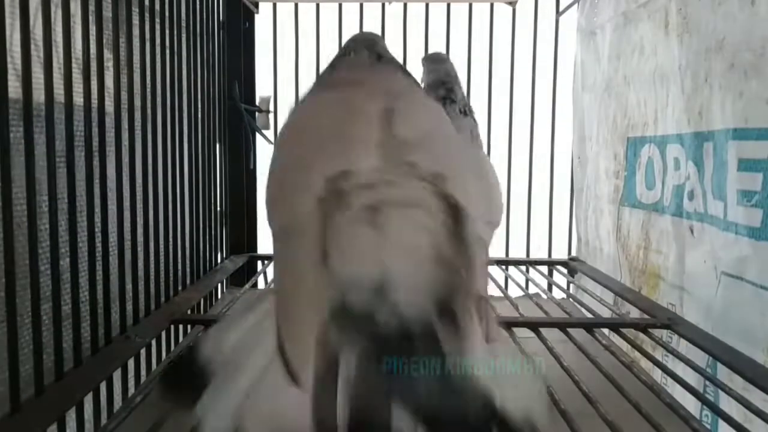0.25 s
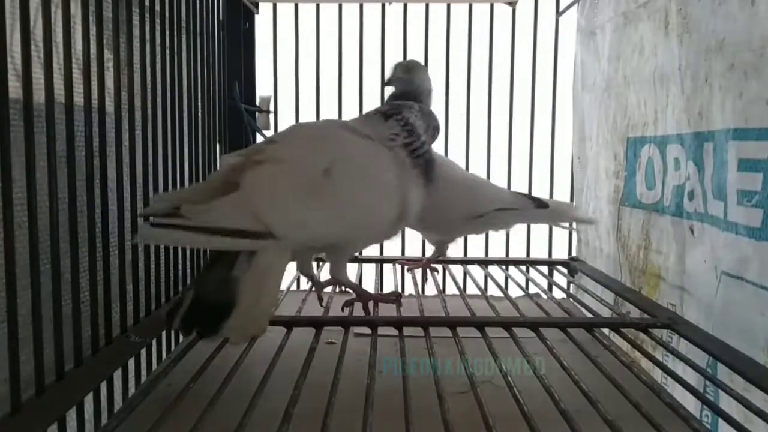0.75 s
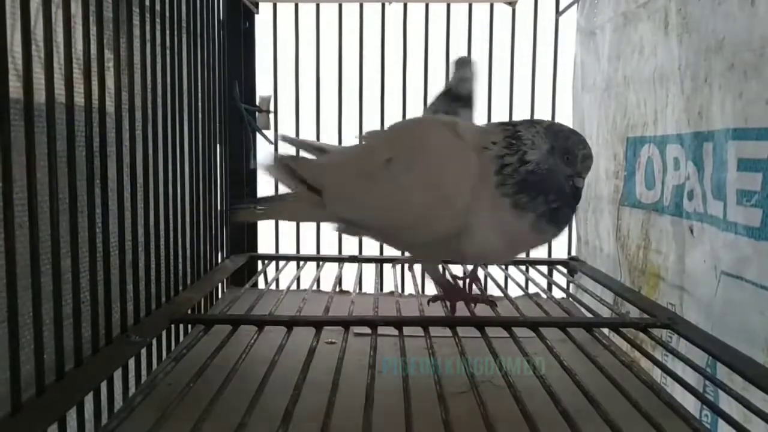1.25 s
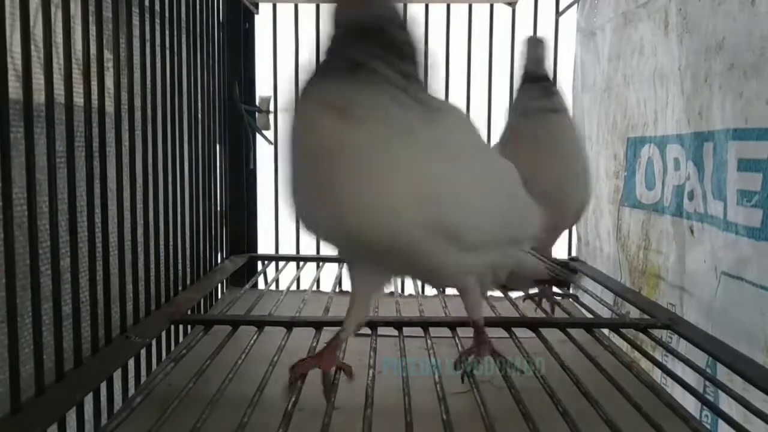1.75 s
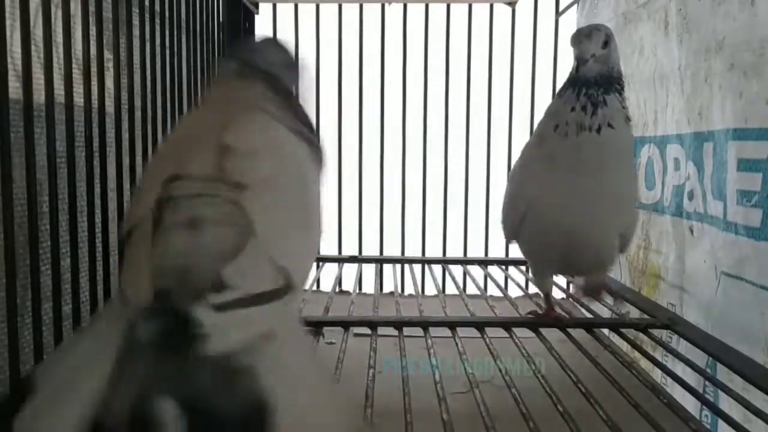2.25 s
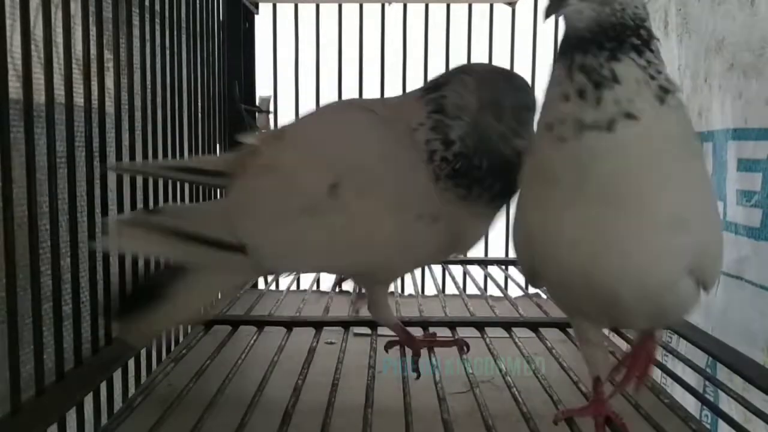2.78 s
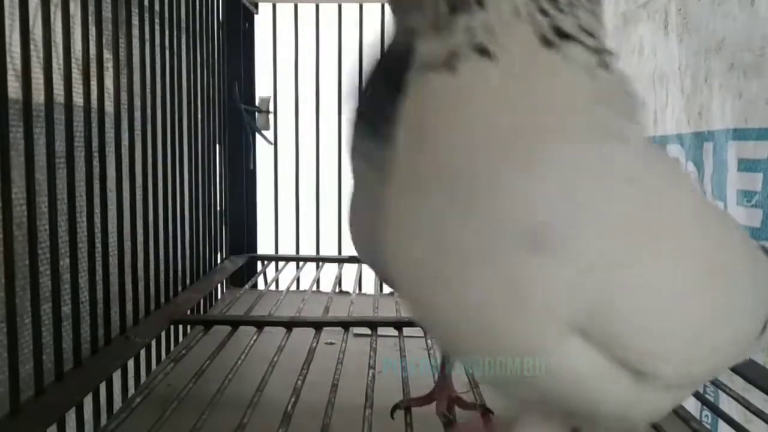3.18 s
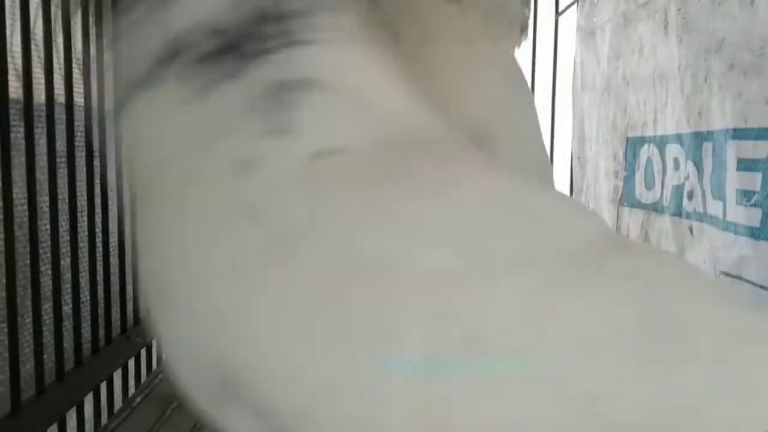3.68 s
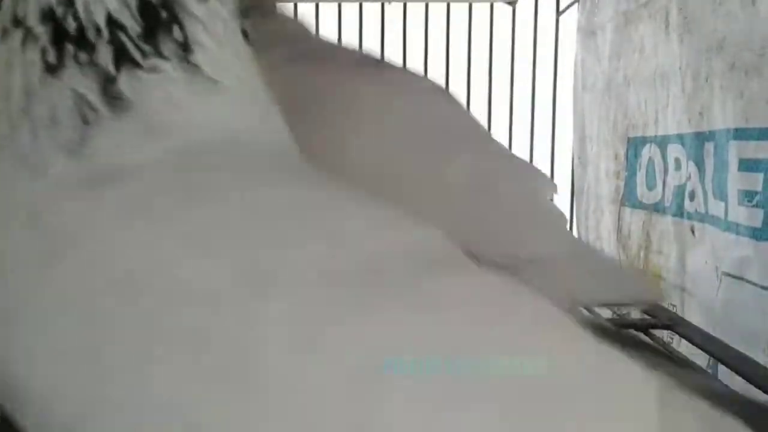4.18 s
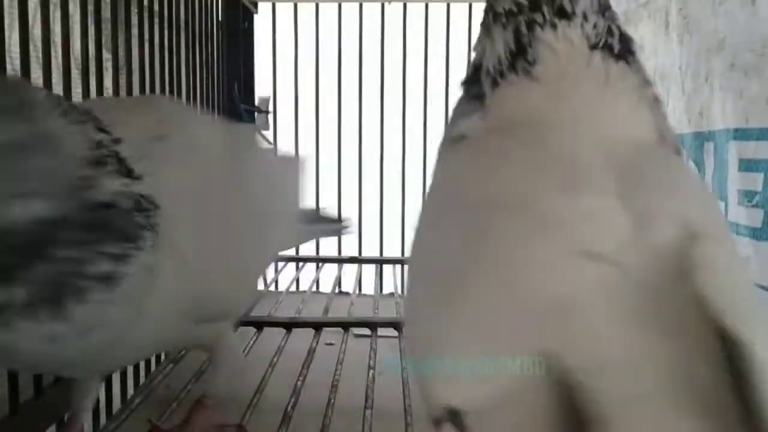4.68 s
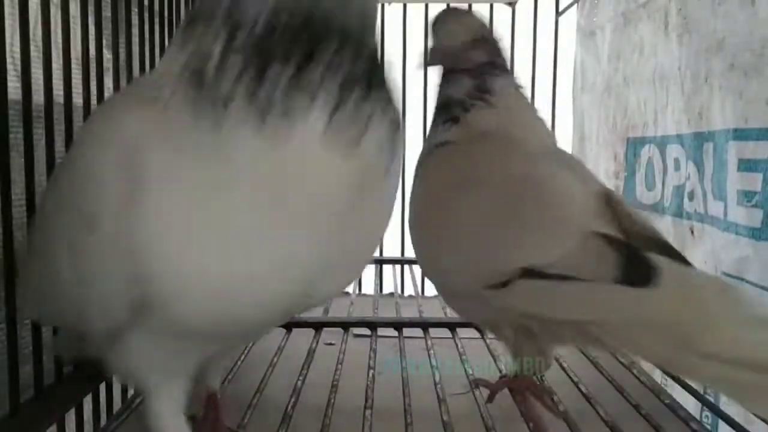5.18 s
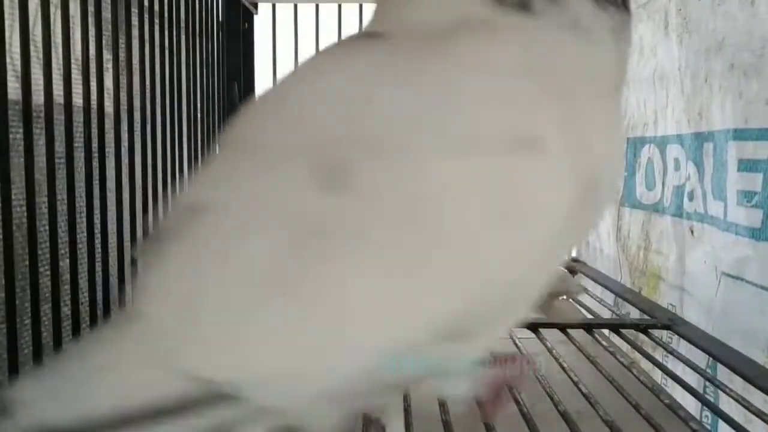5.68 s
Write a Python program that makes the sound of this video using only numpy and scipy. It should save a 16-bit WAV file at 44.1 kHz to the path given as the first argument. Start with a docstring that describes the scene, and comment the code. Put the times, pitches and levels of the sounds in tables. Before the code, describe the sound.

A phone microphone close to a cage in a shed catches a brief feather rustle, a wire tick and a distant crow, then deep pigeon coos at about one, three and five seconds, accelerating into soft rolls. Softer pigeon notes fill the gaps, with metallic claw scrapes, tiny dull foot knocks, a thin far whistle midway and a quiet rumbling background.

```python
"""A pigeon loft: a cock in a wire cage coos three times, in low throbs of a note and its octave that speed into a roll.
Held pigeon notes that swell and stop, short near-pure throbs and gliding or held notes of other pigeons sound around it.
Claws tick, scrape and ring the wire through its bending modes; feet knock the slats as short damped tones.
Plumage brushing the bars is bright patchy noise; a far rooster and a thin whistle are gliding tones. Rumble, draught,
hiss and a soft low noise that swells with each roll are shaped noise; other birds and feet get a short diffuse echo."""
import sys
import numpy as np
from scipy import signal
from scipy.fft import rfft, irfft, next_fast_len
from scipy.io import wavfile
from scipy.ndimage import uniform_filter1d, minimum_filter1d, map_coordinates

SR = 44100
rng = np.random.default_rng(int(sys.argv[2]) if len(sys.argv) > 2 else 0)


def to_wav(s):
    """Save 16-bit WAV."""
    ch = np.atleast_2d(s).T  # columns
    pcm = np.round(np.clip(ch, -1, 1) * 32767)  # PCM
    wavfile.write(sys.argv[1], SR, pcm.astype(np.int16))


N = 261513

# the roll that ends each coo: start/s, end/s, first rate/(throbs per s), last rate/(throbs per s),
# relative peak level/dB, pitch at the start/Hz, peak level of the soft low noise under it/dB
COO_ROLLS = [(1.472, 1.82, 35.4, 48.3, -17, 230, -27.5), (3.312, 3.64, 37.7, 51.5, -14.5, 235, -26),
             (5.222, 5.5, 40.6, 51, -13, 236, -25)]
# spectrum of the soft low noise and of the cock's rasp: f/Hz, relative level per Hz/dB
LOW_NOISE_SPECTRUM = [(150, -40), (227, -1), (300, -3), (445, -2.5), (500, -21.5), (670, -23.5), (900, -45),
                      (1500, -100)]
# spectrum of plumage on the bars, also the base colour of claw scratches: f/Hz, relative level per Hz/dB
BRUSH_SPECTRUM = [(600, -52), (1000, -16), (1850, -10.5), (3460, -9.5), (5310, -6), (8160, 0),
                  (11000, -3.5), (16000, -8)]


def cock(breath_db=-22, rasp_db=-16, third_db=-32, note_s=0.0052, octave_s=0.0056):
    """One running note and its octave, let out in throbs that bend upward; rasp and breath ride on each."""
    # separate throbs before each roll: t/s, relative peak level/dB, pitch/Hz, octave over the note/dB
    single_throbs = [(1.008, -21.5, 222.7, -3.5), (1.152, -19.5, 228.5, -0.5), (1.233, -18.5, 226.6, 0.5),
                     (1.287, -18, 230.9, -0.5), (1.341, -14.5, 230, -1.5), (1.386, -14.5, 227.6, 0),
                     (1.425, -12.5, 227.3, -4.5), (2.886, -18.5, 227, -1), (2.943, -14.5, 229.5, -3),
                     (3.011, -12, 232, -2.5), (3.096, -14.5, 235.9, -1.5), (3.181, -14.5, 234, 1),
                     (3.24, -14, 238.5, 0), (3.282, -14.5, 237, -1.5), (4.599, -17, 199.7, -0.5),
                     (4.766, -13.5, 228.1, -7), (4.842, -11.5, 224.9, -5), (4.916, -12, 233.8, -1),
                     (5.004, -13.5, 239.6, -1.5), (5.085, -14, 258.7, -11), (5.133, -11.5, 258, -7),
                     (5.176, -20, 244, 2), (5.194, -8, 250.6, -7)]
    # breath resonances of the throat: f/Hz, width/Hz, level/dB, all before the sum is squared
    throat_modes = [(218, 110, -3.5), (537, 13, 3), (720, 200, -53.5)]
    scatter_db, jitter_s = 1, 0.0005  # throb to throb
    octave_late_s = 0.00033  # the octave peaks just after the note
    sag_hz = 21.02  # fall of pitch through a roll
    bend_hz = 6.7  # slope of the upward bend at mid-throb, in Hz per note_s
    thin_hz = 204  # the throat radiates little below this

    note, octave, bend = np.zeros((3, N))
    t = np.arange(-SR // 20, SR // 20) / SR
    throbs = [(s, db, octave_db) for s, db, _, octave_db in single_throbs]
    throbs += [beat for coo in COO_ROLLS for beat in roll(*coo[:5])]
    note_bell = np.exp(-(t / note_s) ** 2 / 2)
    octave_bell = np.exp(-(t / octave_s) ** 2 / 2)
    for (s, db, octave_db), chance in zip(throbs, rng.standard_normal((len(throbs), 3))):
        s += t[0] + jitter_s * chance[2]
        add(note, s, amp(db + scatter_db * chance[0]) * note_bell)
        add(octave, s + octave_late_s, amp(db + octave_db + scatter_db * chance[1]) * octave_bell)
        add(bend, s, bend_hz * t / note_s * note_bell)

    pitch_points = [(s, hz) for s, _, hz, _ in single_throbs]
    for s, end, *_, hz, _ in COO_ROLLS:
        pitch_points += [(s, hz), ((s + end) / 2, hz - sag_hz / 2), (end, hz - sag_hz)]
    pitch = curves(sorted(pitch_points))[0] + bend
    phase = 2 * np.pi * (np.cumsum(pitch * (1 + 0.01182 * wobble(25))) / SR + rng.random())
    low = filtered(note * np.cos(phase), lambda f: 1 - 1 / (1 + (f / thin_hz) ** 6))
    high = octave * (np.cos(2 * phase + 0.26) + amp(third_db) * np.cos(3 * phase))

    def throat(f):
        return sum(amp(db) * 1j * f * w / (c * c - f * f + 1j * f * w) for c, w, db in throat_modes) ** 2

    rasp = unit(filtered(rng.standard_normal(N), lambda f: amp(along(LOW_NOISE_SPECTRUM, f))))
    breath = unit(filtered(rng.standard_normal(N), throat))
    return low + high + amp(rasp_db) * note * rasp + amp(breath_db) * octave * breath


def roll(start, end, rate, last_rate, db, octave_db=1.5, fade_db=9.5, octave_fade_db=2):
    """Throbs (s, peak dB, octave over the note dB) that quicken and die away, the octave falling further."""
    t = np.arange(0, end - start, 1 / SR)
    beats = np.cumsum(rate + (last_rate - rate) * t / t[-1]) / SR
    s = t[np.searchsorted(beats, np.arange(int(beats[-1]) + 1))]
    late = (s / t[-1]) ** 3
    return zip(start + s, db - fade_db * late, octave_db - octave_fade_db * late)


def swelling_notes(flutter=0.18, swell=0.27, release_s=0.01):
    """Held pigeon notes that swell for a share of their length, hold and stop; strength and pitch flutter."""
    # notes: start/s, end/s, pitch/Hz, relative level/dB
    notes = [(0.776, 0.803, 410, -31.5), (0.818, 0.866, 441, -21.5), (0.996, 1.028, 397, -23),
             (1.166, 1.215, 434, -25.5), (1.191, 1.296, 375.3, -29.5), (1.295, 1.323, 434, -20.5),
             (1.375, 1.555, 386.6, -25), (1.582, 1.758, 381.8, -25.5), (1.991, 2.038, 438, -32),
             (2.199, 2.403, 345, -34), (2.47, 2.511, 246, -30), (2.525, 2.575, 294, -32),
             (3.651, 3.697, 430, -30.5), (3.698, 3.868, 241.2, -37), (4.053, 4.153, 451, -45),
             (2.497, 2.549, 450, -32), (2.572, 2.658, 434.5, -31.5), (2.705, 2.752, 432, -21),
             (2.767, 2.812, 434, -33.5), (2.884, 3.01, 383, -25), (3.01, 3.106, 388.8, -24),
             (3.146, 3.254, 374.5, -21.5), (3.249, 3.3, 384, -15), (3.337, 3.374, 382, -14),
             (3.374, 3.637, 378.3, -23.5), (3.844, 3.92, 446.6, -30.5), (4.408, 4.439, 363, -28),
             (4.42, 4.477, 322, -32), (4.595, 4.635, 375.5, -19), (4.678, 4.801, 419.3, -27.5),
             (4.81, 4.843, 390, -24.5), (4.853, 4.918, 408, -26.5), (4.921, 5.005, 392.2, -28),
             (5.046, 5.12, 440, -16), (5.132, 5.183, 431.5, -15.5), (5.053, 5.262, 367, -21),
             (5.223, 5.515, 374, -24)]
    out = np.zeros(N)
    strength = 1 + flutter * wobble(45)
    waver = 1 + 0.016 * wobble(25)
    for start, end, hz, db in notes:
        t = np.arange(0, end - start, 1 / SR)
        ramp = np.clip(np.minimum(t / (swell * t[-1]), (t[-1] - t) / release_s), 0, 1)
        pitch = hz * waver[round(start * SR):][:len(t)]
        add(out, start, amp(db) * np.sin(np.pi / 2 * ramp) * tone(pitch))
    return out * strength


def loft(width_s=0.0056):
    """Near-pure throbs of the other birds: sines under short bell-shaped swells."""
    # throbs: t/s, pitch/Hz, relative peak level/dB
    short_throbs = [(0.132, 320, -24), (0.15, 400, -27), (0.155, 252, -28), (0.19, 385, -26),
                    (1.14, 326, -25), (1.767, 345.7, -22), (1.825, 310, -21.5), (1.881, 305, -15.5),
                    (1.947, 324, -19), (1.999, 264, -19.5), (2.044, 283, -17.5), (2.157, 272, -20),
                    (2.214, 362, -21.5), (2.273, 433, -21), (2.316, 425, -19.5), (2.36, 421, -17.5),
                    (2.41, 414, -18), (2.461, 393, -21), (2.581, 414, -22), (2.669, 422, -20),
                    (3.673, 358, -14), (3.745, 347, -14.5), (3.815, 313, -16.5), (3.881, 337, -15.5),
                    (3.942, 310, -19.5), (4.011, 322, -16.5), (4.062, 323, -16.5), (4.095, 342, -21),
                    (4.122, 334, -19), (4.143, 294, -20), (4.451, 460, -26), (4.762, 350, -17.5),
                    (5.0, 361, -16), (5.503, 359.5, -21), (5.845, 314, -23.5)]
    out, t = np.zeros(N), np.arange(-SR // 20, SR // 20) / SR
    bell = np.exp(-(t / width_s) ** 2 / 2)
    for (s, hz, db), turn in zip(short_throbs, rng.random((len(short_throbs), 1))):
        add(out, s + t[0], amp(db) * bell * np.cos(2 * np.pi * (hz * t + turn)))
    return out


def gliding_notes(fade_db=1):
    """Gliding or held notes of other pigeons, some steady, some throbbing as their level rises and falls."""
    # start/s, end/s, first pitch/Hz, last pitch/Hz, relative level/dB, rate/(throbs per s), depth/(0-1)
    glides = [(0.002, 0.045, 215, 220, -32, 40, 0.15), (0.036, 0.11, 275, 300, -30.5, 49, 0.9),
              (0.128, 0.211, 289, 303, -32, 85, 0.96), (0.189, 0.304, 300, 263, -28, 34, 0.1),
              (0.284, 0.357, 270, 247, -37, 34, 0), (0.352, 0.45, 239.2, 222, -39.5, 43, 0),
              (0.537, 0.728, 452, 447, -35.5, 23, 0), (0.49, 0.778, 229.7, 220, -43.5, 23, 0.1),
              (2.067, 2.285, 306.5, 226, -28.5, 48, 0.54), (4.15, 4.327, 315, 276, -29.5, 48, 0.9),
              (4.31, 4.37, 227.6, 240, -28, 24, 0.16), (4.377, 4.432, 222, 235, -28, 21, 0.3),
              (4.341, 4.4, 441, 340, -33, 37, 0.6), (4.457, 4.542, 460, 353, -30, 46, 0.14),
              (5.524, 5.852, 321.3, 366, -30, 42.4, 0.48), (5.854, 5.952, 287.7, 330, -33.5, 61, 1)]
    out = np.zeros(N)
    for start, end, hz, last_hz, db, rate, depth in glides:
        rows = [(start, hz, db), (end, last_hz, db - fade_db)]
        pitch, level_db = curves(rows)
        beat = 2 * np.pi * rate * (np.arange(N) / SR - start) + 0.5 * wobble(25)
        throb = (1 - depth * np.cos(beat)) * amp(0.61 * wobble(27))
        out += gate(rows, 0.014) * amp(level_db) * throb * tone(pitch * (1 + 0.0142 * wobble(35)))
    return out


def hoarse(noise_db=-14, width_hz=70):
    """A gain around 1 that roughens a pure note with noise within width_hz of its pitch."""
    return 1 + amp(noise_db) * wobble(2 * width_hz)


def claws(tick_db=-3, scrape_db=-9, alike=0.043, scratch_db=4, slope_db=30):
    """A crisp tick, a scratchy scrape and the ringing modes of the wire that was caught."""
    # catches: t/s, relative level/dB, wire pitch/Hz, brightest f/Hz, t60/s (0.02 at least),
    # ring over the scratch/dB
    wire_catches = [(0.4605, -25.5, 6340, 7400, 0.16, 3), (0.9595, -28.5, 5960, 9660, 0.24, -10.5),
                    (0.99, -18.5, 6200, 6260, 0.026, -3), (1.0955, -26, 5950, 10200, 0.27, -11),
                    (1.32, -28, 5820, 8406, 0.13, -9.5), (1.633, -19.5, 5900, 8200, 0.22, -12.5),
                    (1.687, -30.5, 5770, 7700, 0.16, -4), (1.797, -40, 6480, 11500, 0.092, -3),
                    (1.9, -28.5, 5740, 9460, 0.21, -2.5), (2.033, -34.5, 6230, 10300, 0.25, -3),
                    (2.1707, -30.5, 5930, 7540, 0.44, -8), (2.5518, -28.5, 6040, 8450, 0.19, -12.5),
                    (2.647, -19.5, 6250, 8060, 0.03, -12), (2.782, -20, 6400, 8380, .03, -14),
                    (2.794, -21.5, 6340, 8060, 0.18, -24), (2.8345, -19.5, 6400, 7670, 0.14, -12),
                    (2.846, -32, 6240, 9000, 0.11, -7), (2.863, -18, 6100, 7760, 0.041, -9),
                    (2.877, -31, 5940, 7800, 0.055, -12), (3.011, -29.5, 5840, 10170, 0.23, -4.5),
                    (3.11, -32, 5840, 11200, 0.15, -9), (3.214, -32, 6180, 10980, 0.71, -15),
                    (3.398, -36, 5937, 9300, 0.21, -5), (3.849, -24, 6410, 11000, 0.25, -11.5),
                    (3.985, -38.5, 6480, 6900, 0.13, 0.5), (4.268, -34, 6050, 9300, 0.3, -3),
                    (4.437, -29, 6000, 9700, 0.27, -17), (4.4694, -29.5, 5690, 11800, 0.11, -1.5),
                    (4.6252, -29, 6275, 9900, 0.31, -11.5), (4.7075, -25.5, 5810, 6800, 0.2, -14),
                    (5.066, -28.5, 6310, 6930, 0.26, -3.5), (5.231, -26.5, 6530, 8500, 0.19, -11),
                    (5.3366, -32.5, 6010, 7364, 0.16, -1)]
    # bending modes of the wire: multiple of the pitch, relative level/dB
    wire_modes = [(.82, -9), (1, -1), (1.265, 0), (1.565, 0), (1.915, 0), (2.27, 0)]
    ring_width_hz, ring_alike = 420, 0.4  # spread of each mode's cluster; share common to both channels

    out, t = np.zeros((2, N)), np.arange(SR // 4) / SR
    multiple, level = np.transpose(wire_modes)[..., None]
    for s, db, hz, bright_hz, t60, ring_db in wire_catches:
        near = -slope_db * np.log(multiple * hz / bright_hz) ** 2
        fade = amp(-60 * t / max(t60, 0.02))
        draw = rng.standard_normal((2, len(wire_modes), 1))

        # neighbouring wires ring along, so each mode beats unevenly and differs from left to right
        knots = rng.standard_normal((2, 3, len(wire_modes), int(t[-1] * ring_width_hz) + 2))
        knots = (knots[0] + 1j * knots[1]) / np.sqrt(2)
        knots = np.sqrt(ring_alike) * knots[0] + np.sqrt(1 - ring_alike) * knots[1:]
        beats = signal.resample(knots, len(t), axis=2)
        mode_hz = hz * multiple * (1 + 0.008 * draw[1])
        modes = amp(level + near + 2 * draw[0]) * np.real(beats * np.exp(2j * np.pi * mode_hz * t))
        ring = amp(ring_db) * modes.sum(axis=1)

        grit = rng.standard_normal((3, len(t)))
        grit = alike * grit[0] + (1 - alike) * grit[1:]
        grit = unit(filtered(grit, lambda f: amp(along(BRUSH_SPECTRUM, f)) * f / (f + 4000)))
        # the claw catches and slips every few milliseconds
        catches = amp(scratch_db * np.interp(t, np.arange(60) * 0.0067, rng.standard_normal(60)))
        scrape = amp(scrape_db) * catches * grit
        tick = amp(tick_db - 60 * t / 0.022) * (1 - np.exp(-(t / 0.002) ** 2))
        builds = fade * (1 - np.exp(-(t / 0.004) ** 2))
        sound = amp(db) * (grit * tick + builds * (scrape + ring))
        add(out[0], s, sound[0])
        add(out[1], s, sound[1])
    return late_left(out)


def steps():
    """Feet on the slats: dull knocks of thin wood, each a pair of quickly damped modes."""
    # knocks: t/s, relative level/dB, pitch/Hz
    knocks = [(0.489, -39, 650), (0.508, -36.5, 628), (0.535, -43, 607), (0.57, -41, 693),
              (0.872, -34, 687), (1.036, -39.5, 626), (1.277, -37, 620), (1.292, -38, 668),
              (1.439, -41, 630), (1.55, -36, 570), (2.416, -41.5, 702), (2.436, -39, 636),
              (2.757, -29.5, 693), (4.306, -42, 704), (4.325, -36, 640), (4.646, -30, 570),
              (5.034, -42.5, 756), (5.57, -50, 625)]
    # modes of the slat: multiple of the pitch, relative level/dB, t60/s
    slat_modes = [(1.002, 10, 0.037), (1.16, -8, 0.068)]
    out, t = np.zeros(N), np.arange(SR // 5) / SR
    for s, db, hz in knocks:
        ring = sum(amp(level - 60 * t / t60) * np.sin(2 * np.pi * k * hz * t) for k, level, t60 in slat_modes)
        add(out, s, amp(db + 4.0) * ring * (1 - np.exp(-(t / 0.0029) ** 2)))
    return out


def feathers():
    """Plumage brushing the bars: bright patchy noise whose level follows the brushes and flickers."""
    # brushing: t/s, mean level/dB
    brush_levels = [(0, -36), (.08, -37.5), (.15, -31.5), (.195, -25.5), (.212, -23), (.24, -24),
                    (.29, -26.5), (.335, -31.5), (.365, -35.5), (.4, -37), (.43, -30), (.46, -35),
                    (.53, -37.5), (.64, -52), (.78, -40), (.96, -45), (1.16, -43), (1.52, -48.5),
                    (1.85, -45.5), (2.12, -45.5), (2.2, -39.5), (2.3, -39.5), (2.43, -37), (2.55, -42),
                    (2.82, -47), (3.07, -50), (3.22, -45.5), (3.38, -52), (3.7, -49.5), (4.05, -44),
                    (4.28, -43), (4.67, -50), (4.82, -42.5), (5.25, -44.5), (5.58, -42.5), (5.93, -41)]
    flicker_db = 1.5 * wobble(500) + 1.4 * wobble(45) + 0.8 * wobble(9.2)
    return amp(curves(brush_levels)[0] + flicker_db) * rush(BRUSH_SPECTRUM, patchy_db=2.8)


def low_noise(floor_db=-37.5, peak_late_s=0.11, slope_db_per_s=23.5):
    """Soft low noise in the coos' band that swells to a peak in each of the cock's rolls and falls as fast."""
    swells = [(coo[0] + peak_late_s, coo[-1]) for coo in COO_ROLLS]
    level_db = peaks(swells, floor_db, slope_db_per_s, slope_db_per_s)
    return amp(level_db + 0.69 * wobble(33)) * rush(LOW_NOISE_SPECTRUM, patchy_db=0.0)


def rooster():
    """A far crow: harmonics 2 to 4 of a gliding pitch, each wavering by itself."""
    # crow: t/s, pitch/Hz, then relative levels of the 2nd, 3rd and 4th harmonic/dB
    crow = [(.43, 510, -62, -60, -75), (.45, 505, -56, -51, -72), (.495, 535, -56, -54, -70),
            (.53, 580, -66, -66, -72), (.555, 590, -52, -57, -68), (.596, 594, -46, -48, -65),
            (.63, 596, -52, -53, -64), (.68, 595, -50, -56, -61), (.72, 592, -48, -58, -57),
            (.77, 594, -56, -63, -62), (.83, 590, -57, -70, -66), (.92, 592, -65, -75, -68)]
    hz, *levels = curves(crow)
    hz = hz * (1 + 0.004 * wobble(40))
    out = np.zeros(N)
    for k, db in enumerate(levels, start=2):
        out += amp(db + 1.6 * wobble(35)) * tone(k * hz * (1 + 0.003 * wobble(60)))
    return gate(crow, 0.013) * out


def whistles():
    """A far bird's thin whistles: single gliding tones with a wavering level."""
    # one list per whistle: t/s, f/Hz, relative level/dB
    whistle_glides = [
        [(3.44, 2130, -63), (3.48, 2150, -59), (3.514, 2073, -47), (3.555, 1890, -48), (3.575, 1810, -58)],
        [(3.585, 2085, -57), (3.615, 2030, -55), (3.65, 2090, -58), (3.73, 2080, -64)],
        [(3.8, 2130, -63), (3.92, 2150, -63), (3.96, 2120, -50), (3.99, 2180, -52), (4.05, 2150, -63),
         (4.2, 2080, -62), (4.32, 2055, -65)],
    ]
    out = np.zeros(N)
    for rows in whistle_glides:
        hz, db = curves(rows)
        out += gate(rows, 0.01) * amp(db + 2.5 * wobble(35)) * tone(hz * (1 + 0.006 * wobble(40)))
    return out


def far_birds():
    """Rooster and whistle, both from one side, with the shed's echo."""
    out = rooster() + whistles()
    return late_left(out + amp(-9) * shed(out))


def draught():
    """Air stirred past the phone: very low noise that swells in gusts."""
    # gusts: t of the peak/s, peak level/dB
    gust_peaks = [(.45, -35.5), (5.14, -33.5)]
    # spectrum: f/Hz, relative level per Hz/dB
    draught_spectrum = [(10, -30), (24, 2), (33, -26), (45, -2.5), (70, -17), (150, -37.5)]
    level_db = peaks(gust_peaks, floor_db=-58.5, rise=77, fall=47)
    return amp(level_db) * rush(draught_spectrum, patchy_db=3.0)


def yard():
    """Slowly wavering rumble and steady far noise with a hiss on top."""
    # spectra of the rumble and of the far noise: f/Hz, relative level per Hz/dB
    rumble_spectrum = [(22, -0.5), (33, -3.5), (50, -3.5), (100, -1.5), (150, -5.5), (200, -10.5),
                       (300, -61)]
    far_spectrum = [(290, -62), (500, 1), (790, -11.5), (1100, -15.5), (1500, -19), (2200, -17),
                    (3000, -22.5), (6000, -30.5), (9000, -62)]
    rumble = amp(-43.5 + 1.6 * wobble(6.3)) * rush(rumble_spectrum, patchy_db=1.0)
    return rumble + amp(-45.5) * rush(far_spectrum, patchy_db=2.5)


def shed(x):
    """The shed's diffuse stereo echo: a noise tail in which each frequency dies at its own speed."""
    # decay: f/Hz, t60/s
    decay = [(200, 0.18), (1000, 0.53), (8000, 0.008)]
    hz, t, z = signal.stft(rng.standard_normal((2, SR // 2)), SR, nperseg=256)
    tail = signal.istft(z * amp(-60 * t / along(decay, hz)[:, None]), SR, nperseg=256)[1]
    return signal.fftconvolve(x[None], tail / np.linalg.norm(tail[0]), axes=1)[:, :N]


def rush(spectrum, patchy_db):
    """Stereo noise of rms 1 with patches of random gain; above the bass it reaches the right first."""
    # likeness of the channels: f/Hz, left-right correlation
    likeness = [(30, 0.95), (130, 0.92), (300, 0.99), (640, 0.46), (1000, 0.021), (4000, 0.016),
                (15000, 0.01)]
    z = signal.stft(rng.standard_normal((2, N)), nperseg=512)[2]
    field = uniform_filter1d(uniform_filter1d(rng.standard_normal(z.shape[1:]), 6, 0), 8, 1)
    pair = signal.istft(z * amp(patchy_db * unit(field)), nperseg=512)[1][:, :N]

    def mid_side(hz):
        turn = np.arccos(np.clip(along(likeness, hz), -1, 1)) / 2
        return amp(along(spectrum, hz)) * [np.cos(turn), np.sin(turn)]

    mid, side = filtered(pair, mid_side)
    return late_left(unit(np.array([mid + side, mid - side])))


def late_left(pair, lag_s=17 / 44100):
    """Above the bass the left channel hears a little later; the lag is full from 1550 Hz."""
    def response(hz):
        lag = lag_s * np.clip((hz - 450) / 1100, 0, 1)
        return np.exp(-1j * np.pi * hz * lag * [[1], [-1]])

    return filtered(pair, response)


def amp(db):
    """Decibels to a factor of amplitude."""
    return 10 ** (np.asarray(db) / 20)


def unit(x):
    """x scaled to rms 1."""
    return x / np.sqrt(np.mean(x ** 2) + 1e-20)


def along(points, hz):
    """(Hz, value) points read on a log axis."""
    f, v = np.transpose(points)
    return np.interp(np.log(hz + 1), np.log(f + 1), v)


def curves(rows):
    """One value per sample for each column after the time."""
    s, *cols = np.transpose(rows)
    return [np.interp(np.arange(N) / SR, s, c) for c in cols]


def gate(rows, edge):
    """1 between the first and last row, fading over edge seconds inside them."""
    t = np.arange(N) / SR
    return np.clip(np.minimum(t - rows[0][0], rows[-1][0] - t) / edge, 0, 1)


def peaks(rows, floor_db, rise, fall):
    """A level in dB that climbs from a floor to each (s, dB) peak and sinks back, in dB per s."""
    t = np.arange(N) / SR
    slopes = [db - np.maximum(rise * (s - t), fall * (t - s)) for s, db in rows]
    return np.max([np.full(N, floor_db)] + slopes, axis=0)


def wobble(rate):
    """A smooth random curve, rate knots a second."""
    return map_coordinates(rng.standard_normal(int(N * rate / SR) + 4), [np.arange(N) * rate / SR])


def filtered(x, response):
    """x passed through a complex response of frequency."""
    m = next_fast_len(x.shape[-1] + SR // 4)
    return irfft(rfft(x, m) * response(np.fft.rfftfreq(m, 1 / SR)), m)[..., :x.shape[-1]]


def add(track, s, sound):
    """Mix a sound in, starting at s seconds."""
    start = round(s * SR)
    part = track[max(start, 0):start + len(sound)]
    part += sound[max(-start, 0):][:len(part)]


def tone(hz):
    """A sine of rms 1 on a pitch curve, from a random phase."""
    return np.sqrt(2) * np.sin(2 * np.pi * (np.cumsum(hz) / SR + rng.random()))


def scene():
    """The pigeons slightly right of centre, feet in the middle, a short diffuse echo, then the rest."""
    near = cock()
    others = hoarse() * loft() + hoarse() * gliding_notes() + hoarse() * swelling_notes()
    feet = steps()
    direct = near * amp([[-0.4], [0.4]]) + others * amp([[-0.2], [0.2]]) + feet
    # the cock is practically dry
    echo = shed(amp(-65.0) * near + amp(-22.5) * others + amp(-6) * feet)
    return direct + echo + claws() + feathers() + low_noise() + far_birds() + draught() + yard()


def record(dry, ceiling=0.58, top_hz=15950):
    """The phone's limiter turns down the loudest moments; nothing stays above its band limit."""
    needed = np.minimum(1, ceiling / (np.abs(dry).max(axis=0) + 1e-9))
    # held over 20 ms, smoothed over 10 ms
    gain = uniform_filter1d(minimum_filter1d(needed, size=882), size=441)
    return filtered(dry * gain, lambda hz: hz < top_hz)


dry = scene()
out = record(dry)
to_wav(out)
```